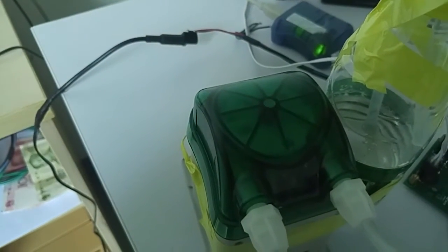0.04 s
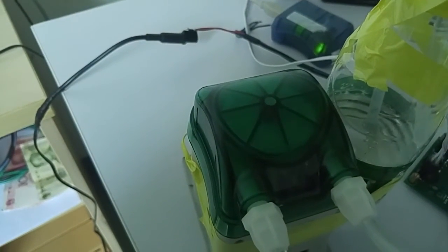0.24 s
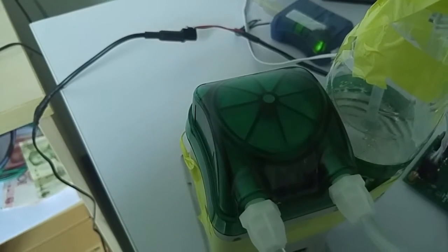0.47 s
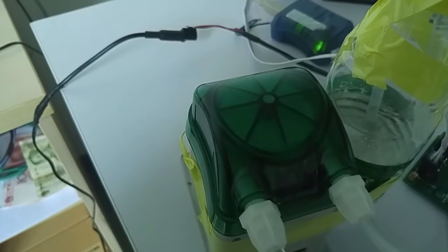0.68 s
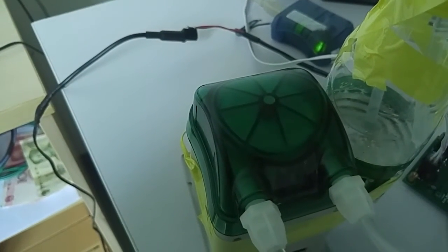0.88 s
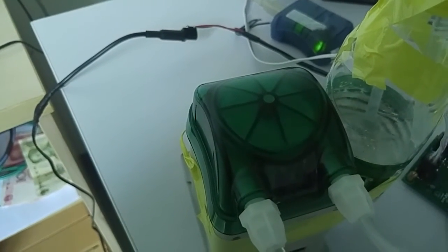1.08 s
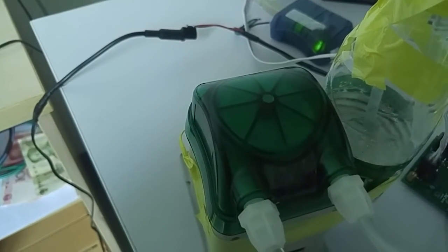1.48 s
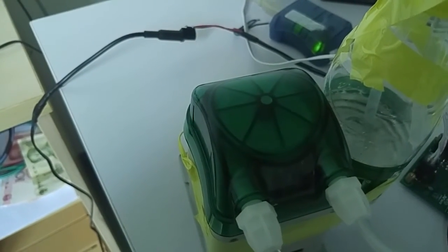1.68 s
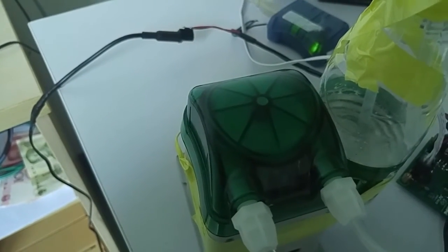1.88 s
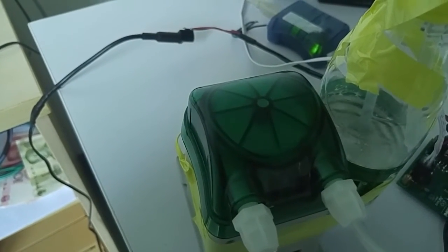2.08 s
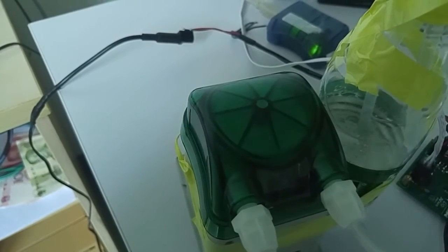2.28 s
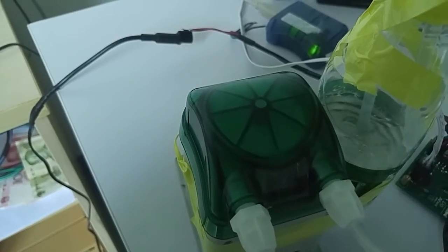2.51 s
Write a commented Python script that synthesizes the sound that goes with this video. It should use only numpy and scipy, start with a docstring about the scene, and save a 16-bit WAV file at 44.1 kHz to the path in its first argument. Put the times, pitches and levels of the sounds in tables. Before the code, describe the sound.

Close by in a quiet room, a small motor-driven pump shudders and quickly sweeps up in pitch. It settles into an even whine with a fast, pulsing clatter, dotted with light plastic clicks.

```python
"""Roller pump on a desk

A quiet room, two microphones close by. A stepper motor whistles faintly, judders and sweeps through
the resonance of its housing, then drives a small roller pump at about seven turns a second: a steady
step whine, a rattle that comes round with every turn, four roller knocks and, on most turns, a tick."""
import sys
import numpy as np
from scipy import signal
from scipy.fft import rfft, irfft, next_fast_len
from scipy.io import wavfile

SR = 44100
rng = np.random.default_rng(int(sys.argv[2]) if len(sys.argv) > 2 else 0)


def output_pcm(signal):
    """Save a mono or channel-first signal as 16-bit PCM at the path in sys.argv[1].

    Samples are clipped to [-1, 1] before scaling.
    """
    pcm = np.clip(np.atleast_2d(signal).T, -1, 1) * 32767
    wavfile.write(sys.argv[1], SR, np.round(pcm).astype(np.int16))


N = 116865

STEPS_PER_TURN, CRUISE_HZ, CRUISE_S, FIRST_TURN_S = 200, 1421.15, .356, .279

# The microphone pair. Each row: frequency in Hz, then right minus left in dB (BALANCE),
# likeness from 0 to 1 (COHERENCE) or the left side's lead in radians (LEFT_LEAD).
BALANCE = [(150, 1.5), (310, -0.5), (400, -1.5), (520, -9.5), (660, -8.5), (800, 0), (1150, -9.5),
           (2500, -9.5), (5800, -9), (7100, -1.5), (8400, 4), (10000, 2.5), (15000, -2)]
COHERENCE = [(60, 1), (180, .94), (550, .92), (1650, .5), (5000, .8), (15000, .7)]
LEFT_LEAD = [(100, -0.35), (400, 0.31), (700, 0.098), (1500, -0.18), (4000, -1.73), (8000, -1.43),
             (15000, -1.74)]
# Noise colours at the left microphone. Each row: frequency in Hz, density in dB per Hz at unit drive.
ROOM_COLOUR = [(20, -100), (35, -92), (48, -71), (80, -76.5), (150, -80.5), (300, -83.5), (700, -83.5),
               (1500, -100), (5000, -103), (16000, -114)]
JUDDER_COLOUR = [(40, -89), (250, -62.5), (310, -41), (350, -48.5), (405, -41), (480, -57.5), (550, -48.5),
                 (680, -39), (950, -38), (1300, -60.5), (1700, -48), (2000, -63.5), (2550, -51.5),
                 (3000, -66.5), (6000, -71), (9000, -80.5), (13000, -83.5), (16000, -105)]
RUB_COLOUR = [(30, -100), (250, -82.5), (400, -71), (510, -85.5), (690, -62.5), (1000, -68.5),
              (1300, -65.5), (1700, -78.5), (2000, -74.5), (2600, -78.5), (3300, -77), (4400, -75),
              (5000, -78.5), (6100, -76.5), (7300, -80), (7800, -85), (8400, -81.5), (10000, -91),
              (13300, -91), (16000, -108)]
RATTLE_COLOUR = [(25, -136), (38, -112), (50, -73), (100, -81), (150, -64.5), (250, -72.5), (305, -63),
                 (335, -72), (375, -56), (415, -60.5), (450, -65.5), (520, -91), (580, -70.5), (660, -51),
                 (760, -56), (890, -66), (970, -68.5), (1150, -63.5), (1300, -80), (1500, -63), (1750, -60),
                 (2000, -103.5), (4000, -117), (16000, -130)]
THUD_COLOUR = [(100, -71.5), (410, -61), (460, -73), (540, -83), (680, -50.5), (880, -54.5), (1000, -46),
               (1150, -52), (1300, -58), (1650, -48), (1850, -52.5), (2100, -70.5), (16000, -120)]
CLACK_COLOUR = [(200, -170), (1200, -69), (2000, -61.5), (2550, -52), (3200, -60), (4200, -61.5),
                (5200, -64.5), (9000, -135), (16000, -110)]
CLICK_COLOUR = [(200, -103), (2000, -105), (4000, -80), (5000, -60.5), (6050, -55), (7000, -74),
                (8000, -71.5), (10000, -80.5), (13500, -84), (16000, -105)]
TICK_COLOUR = [(200, -95), (1500, -66), (2700, -52), (3300, -53), (4100, -45.5), (5000, -53), (6050, -47),
               (7000, -51), (8000, -56), (10000, -76.5), (13500, -73), (16000, -92)]
SNAP_COLOUR = [(6000, -100), (9000, -55.5), (14000, -63), (16000, -75)]
# Room hum. Each row: frequency in Hz, level in dB.
HUM_TONES = [(48.4, -62), (145.3, -58)]
# The motor's ramp. Each row: time in seconds, steps per second, step tone in dB, its octave in dB.
MOTOR_RAMP = [(.17, 120.3, -74, -66), (0.223, 310.1, -45, -53), (.24, 403.6, -25, -40),
              (.252, 523.5, -27, -32), (.26, 615, -12.5, -42), (.266, 680, -6.5, -74),
              (.28, 816.8, -7.5, -25), (0.294, 934.5, -10.5, -37), (.302, 1004, -10, -46),
              (0.311, 1055, -25, -35), (.326, 1186, -19.5, -41), (.337, 1290, -53, -37),
              (.356, 1422, -48, -56), (.38, 1421, -50, -65)]
# Swell and fade of the judder, the whole running pump, the whine, and the knocks' thud and clatter.
# Each row: time in seconds, gain in dB.
JUDDER_GAIN = [(.168, -49), (.176, -23), (.185, -18), (.192, -9.5), (.204, -11.5), (.21, 0), (.224, 0.5),
               (.236, -3), (.248, -11.5), (.27, -18), (.34, -11), (.38, -27.5)]
PUMP_EFFORT = [(.16, -80), (.19, -2.5), (.3, -7.5), (.345, -4.5), (.42, 0), (1.1, -0.5), (1.5, 0),
               (1.85, -1), (2.3, -.5), (2.64, -2.5)]
WHINE_GAIN = [(.17, -58), (.335, -28), (.358, 0)]
KNOCK_WEIGHT = [(.3, 0.5), (.7, -1.5), (1.2, 0), (1.5, 0.5), (1.85, -1), (2.05, 0), (2.6, -1.5)]
KNOCK_HARDNESS = [(.3, -4), (.7, -1.5), (1.2, 0), (1.7, 0.5), (2.6, -2)]
# The whine. Each row: cycles per turn, left and right in relative dB, lag of the right in radians.
WHINE_TONES = [(16, -49, -49, 0), (44, -45, -46, 0), (57, -43, -47, 0), (100, -32, -37, -.08),
               (134, -44, -47, -.6), (139, -46, -49, -.6), (200, -37, -48, -1.4), (300, -50, -63, 1.2),
               (400, -44.5, -49.5, 1.5), (600, -41.5, -51, .8), (650, -50, -58, 1.5), (1050, -54, -56, 1.8),
               (1150, -48, -46, .3), (1300, -64, -59, 1.9), (1450, -66, -60, 1.5)]
# Housing resonances. Each row: start and length in seconds, pitch in Hz, peak in dB.
HOUSING_MODES = [(.224, 0.049, 388.6, -19.5), (.226, 0.019, 1725, -23), (0.326, .026, 710, -25),
                 (0.337, 0.029, 391, -26.5)]
# Four roller knocks, the second doubled. Each row: seconds into the turn,
# thud, clack and click in relative dB, ring pitch in Hz, ring in relative dB.
ROLLER_KNOCKS = [(.0112, -3.5, -0.5, 0.5, 1060, -26.5), (.0445, -2, -4, -1.5, 1630, -30),
                 (.0485, -4, -12, -31, 690, -21), (.0814, -8.5, -6, -5, 1143, -20.5),
                 (.1178, 0, 2, 1, 878, -33)]
# Loose parts. Each row: seconds into the turn, clack and click in relative dB, click scatter in dB.
LOOSE_CLICKS = [(.0295, -24, -32, 7), (.0362, -10, -19, 26.5), (.0643, -19, -14, 17), (.1055, -19, -5, 4),
                (.1335, -9.5, -7.5, 2)]
# Pump head ticks. Each row: start in seconds, snap gain in dB, ping pitch in Hz, ping peak in dB.
HEAD_TICKS = [(0.4313, -8, 6104, -18), (0.5706, -12, 4700, -22), (0.7125, -4, 7080, -15.5),
              (.8545, -9.5, 5914, -28), (0.883, -12, 6120, -30), (0.994, -3.5, 6140, -11.5),
              (1.2752, -5, 6050, -13.5), (1.4161, -4, 5880, -23), (1.511, -15, 6340, -17.5),
              (1.5583, -9, 5700, -32), (1.6974, -7, 6705, -14), (1.98, -10, 5620, -28),
              (2.1192, -0.5, 6140, -17), (2.2604, -5.5, 6020, -8.5), (2.5421, -4.5, 6470, -13)]
# Bouncing rollers. Each row: start in seconds, thud gain in dB, clack gain in dB.
ROLLER_BOUNCES = [(.4655, 1, -9), (.549, -9, -3), (1.452, -6, -14), (1.592, -0.5, -12), (1.666, -0.5, -12),
                  (1.947, -5.5, 0.5), (2.012, -2, -15), (2.087, -3, -5), (2.369, -8, -4)]
# Tubing snaps. Each row: start in seconds, gain in dB.
TUBE_SNAPS = [(0.847, -9), (0.8852, -9), (1.413, -2), (1.5363, -12), (1.5529, -4)]


def amp(db):
    return 10 ** (np.asarray(db) / 20)


def read(points, hz):
    """A curve's value at hz, on a log frequency axis."""
    f, value = np.transpose(points)
    return np.interp(np.log(hz + 1), np.log(f + 1), value)


def level(points):
    """Gain at every sample from a curve of seconds and dB."""
    return amp(np.interp(np.arange(N) / SR, *np.transpose(points)))


def drift(hz):
    """Random wander of unit size, mostly slower than hz."""
    lowpass = 1 + (np.fft.rfftfreq(N, 1 / SR) / hz) ** 4
    wander = irfft(rfft(rng.standard_normal(N)) / lowpass, N)
    return wander / wander.std()


def radiate(drive, colour):
    """Two white drives take a causal colour and reach the two microphones."""
    size = 2 * next_fast_len(N // 2 + 4096)
    hz = np.fft.rfftfreq(size, 1 / SR)
    log_gain = np.log(amp(read(colour, hz)) * np.sqrt(SR / 2))
    mirrored = np.r_[log_gain, log_gain[-2:0:-1]]
    body = np.exp(signal.hilbert(mirrored).conj())[:len(hz)]  # minimum phase
    left, unrelated = rfft(drive, size) * body
    same = np.clip(read(COHERENCE, hz), 0, 1)
    right = same * left * np.exp(-1j * read(LEFT_LEAD, hz)) + np.sqrt(1 - same ** 2) * unrelated
    return irfft(np.array([left, right * amp(read(BALANCE, hz))]), size)[:, :N]


def bursts(times, dbs, decay_s, attack_s=.00029):
    """Envelope of blows that rise at once and die away; their powers add."""
    t, power = np.arange(N) / SR, np.zeros(N)
    for start, db in zip(times, dbs):
        near = (t > start) & (t < start + 10 * decay_s)
        age = t[near] - start
        power[near] += (amp(db) * np.minimum(age / attack_s, 1) * np.exp(-age / decay_s)) ** 2
    return np.sqrt(power) * np.exp(attack_s / decay_s)


def rings(times, pitches, dbs, rise_s, decay_s, right_db):
    """Struck tones that rise and die away, with their own gain at the right microphone."""
    t, out = np.arange(N) / SR, np.zeros(N)
    for start, hz, db in zip(times, pitches, dbs):
        age = np.maximum(t - start, 0)
        shape = np.minimum(age / rise_s, np.exp((rise_s - age) / decay_s))
        out += amp(db) * shape * np.sin(2 * np.pi * hz * age)
    return out * amp([[0], [right_db]])


def noise():
    """Two channels of white noise."""
    return rng.standard_normal((2, N))


def worn(repeat_share=.65):
    """Roughness of the turning parts: a share comes back on every turn, the rest is chance."""
    period = round(SR * STEPS_PER_TURN / CRUISE_HZ)
    turn = irfft(np.exp(2j * np.pi * rng.random((2, period // 2 + 1))), period)
    repeating = turn[:, np.arange(N) % period] / turn.std()
    return np.sqrt(repeat_share) * repeating + np.sqrt(1 - repeat_share) * noise()


def every_turn(table):
    """Repeats rows that are timed within one turn; returns the columns."""
    turns = np.arange(FIRST_TURN_S, N / SR, STEPS_PER_TURN / CRUISE_HZ)
    offset, *rest = np.tile(table, (len(turns), 1)).T
    return offset + np.repeat(turns, len(table)), *rest


def room():
    """Quiet room tone, with a faint hum alike at both microphones."""
    t = np.arange(N) / SR
    hum = sum(np.sqrt(2) * amp(db) * np.sin(2 * np.pi * hz * t) for hz, db in HUM_TONES)
    return radiate(noise(), ROOM_COLOUR) + hum


def coil_whistle(hz=11300, db=-70, start_s=.05, end_s=.19):
    """The energised coils whistle faintly before the motor gets going."""
    t = np.arange(N) / SR
    gate = np.clip(np.minimum(t - start_s, end_s - t) / .01, 0, 1)
    return np.sqrt(2) * amp(db) * gate * np.sin(2 * np.pi * hz * t)


def motor_steps():
    """Steps taken so far: the rate ramps up, then the driver holds it."""
    t = np.arange(N) / SR
    times, rates = np.transpose(MOTOR_RAMP)[:2]
    return np.cumsum(np.where(t < CRUISE_S, np.interp(t, times, rates), CRUISE_HZ)) / SR


def spin_up(step, right_db=-7.5, right_lag_rad=-.12):
    """The first slow steps jolt the pump; then the step tone sweeps through the housing's resonance."""
    ramp = np.array(MOTOR_RAMP)
    phase = 2 * np.pi * step - np.array([[0], [right_lag_rad]])
    tone = sum(level(ramp[:, [0, k + 1]]) * np.sin(k * phase) for k in (1, 2))
    flutter = 1 + .05 * drift(hz=69)
    sweep = np.sqrt(2) * tone * flutter * amp([[0], [right_db]])
    jolts = np.diff(np.floor(step), prepend=0) / np.sqrt(np.gradient(step))  # one pulse a step
    rough_jolts = jolts * (1 + .5 * noise()) * np.array([[-1], [1]])
    judder = .47 * rough_jolts + .95 * noise()
    return sweep + radiate(judder * level(JUDDER_GAIN), JUDDER_COLOUR)


def rub():
    """The running pump rubs: a broad hiss whose level flickers by about a decibel."""
    return radiate(noise() * amp(drift(hz=120)), RUB_COLOUR)


def rattle():
    """The turning parts give a low rattle that comes round with every turn."""
    return radiate(worn(), RATTLE_COLOUR)


def whine(step, gain_db=1.53, sway=.12, sway_rad=.13, waver=.21, waver_hz=24.7):
    """Tones locked to the shaft, swaying with the load four times a turn and wavering a little."""
    angle, out = 2 * np.pi * step / STEPS_PER_TURN, np.zeros((2, N))
    for order, left_db, right_db, lag in WHINE_TONES:
        start_phase, load_phase = 2 * np.pi * rng.random(2)
        load = np.sin(4 * angle + load_phase)
        size = 1 + sway * load + waver * drift(waver_hz)
        phase = order * angle + start_phase + sway_rad * load + waver * drift(waver_hz)
        out += size * amp([[left_db], [right_db]]) * np.sin(phase - np.array([[0], [lag]]))
    return np.sqrt(2) * amp(gain_db) * out * level(WHINE_GAIN)


def housing_swells():
    """Modes of the housing sound briefly during the spin-up."""
    t, out = np.arange(N) / SR, np.zeros(N)
    for start, length, hz, db in HOUSING_MODES:
        arch = np.sin(np.pi * np.clip((t - start) / length, 0, 1))
        out += amp(db) * arch * np.sin(2 * np.pi * hz * (t - start))
    return out


def roller_knocks():
    """The rollers knock at the same places on every turn; the housing thuds and rings briefly."""
    times, thud_db, clack_db, click_db, ring_hz, ring_db = every_turn(ROLLER_KNOCKS)
    scatter_db = .3 * rng.uniform(-1, 1, len(times))
    detune, strength = rng.uniform(-1.25, 1, (len(times), 2)).T
    ring = rings(times, ring_hz * (1 + .039 * detune), ring_db + 3.5 * strength,
                 rise_s=.0022, decay_s=.0067, right_db=-12.5)
    thud = radiate(worn() * bursts(times, thud_db + scatter_db, decay_s=.0054), THUD_COLOUR)
    contact = clatter(times, clack_db + scatter_db, click_db + scatter_db)
    return level(KNOCK_WEIGHT) * (thud + ring) + level(KNOCK_HARDNESS) * contact


def clatter(times, clack_db, click_db):
    """Plastic on plastic: a clack and a shorter, brighter click."""
    clack = radiate(noise() * bursts(times, clack_db, decay_s=.0047), CLACK_COLOUR)
    click = radiate(noise() * bursts(times, click_db, decay_s=.0018), CLICK_COLOUR)
    return clack + click


def chatter():
    """Loose parts click lightly between the knocks, louder on some turns."""
    times, clack_db, click_db, scatter_db = every_turn(LOOSE_CLICKS)
    return clatter(times, clack_db, click_db + scatter_db * rng.uniform(-.99, 1, len(times)))


def head_ticks(snap_s=.0017, rebound_s=.0021, rebound_db=-3.5, tail_db=-9.5, grit_db=2.5):
    """Plastic snaps in the pump head, mostly once a turn: a gritty snap, a rebound and a short tail."""
    times, dbs = np.transpose(HEAD_TICKS)[:2]
    snap = bursts(times, dbs, snap_s)
    rebound = bursts(times + rebound_s, dbs + rebound_db, snap_s)
    tail = bursts(times, dbs + tail_db, decay_s=.0075)
    envelope = np.sqrt(snap ** 2 + rebound ** 2 + tail ** 2)
    grit = amp(grit_db * drift(hz=2460))
    return radiate(noise() * grit * envelope, TICK_COLOUR)


def head_pings():
    """Each tick rings the pump head at its own pitch, mostly in the left microphone."""
    times, _, pitches, dbs = np.transpose(HEAD_TICKS)
    return rings(times, pitches, dbs, rise_s=.00074, decay_s=.0012, right_db=-15.5)


def roller_bounces(count=3, gap_s=.00443, fade_db=-1.5):
    """Now and then a roller bounces: a quick cluster of fading blows."""
    start, thud_db, clack_db = np.transpose(ROLLER_BOUNCES)[:, :, None]
    bounce, out = np.arange(count), np.zeros((2, N))
    times = (start + gap_s * bounce).ravel()
    for db, colour in ((thud_db, THUD_COLOUR), (clack_db, CLACK_COLOUR)):
        blows = bursts(times, (db + fade_db * bounce).ravel(), decay_s=.0027)
        out += radiate(noise() * blows, colour)
    return out


def tube_snaps():
    """The squeezed tubing gives a few thin, bright snaps."""
    return radiate(noise() * bursts(*np.transpose(TUBE_SNAPS), decay_s=.00075), SNAP_COLOUR)


def scene():
    """Motor, pump and room at the two microphones."""
    step = motor_steps()
    running = rub() + whine(step) + rattle() + roller_knocks() + chatter()
    starting = coil_whistle() + spin_up(step) + housing_swells()
    accents = roller_bounces() + head_ticks() + head_pings() + tube_snaps()
    return room() + starting + level(PUMP_EFFORT) * running + accents


def record(dry):
    """The recorder cuts the treble above 16.3 kHz."""
    lowpass = signal.firwin(511, 16300, window=("kaiser", 9), fs=SR)
    return signal.oaconvolve(dry, lowpass[None], "same")


dry = scene()
out = record(dry)
output_pcm(out)
```